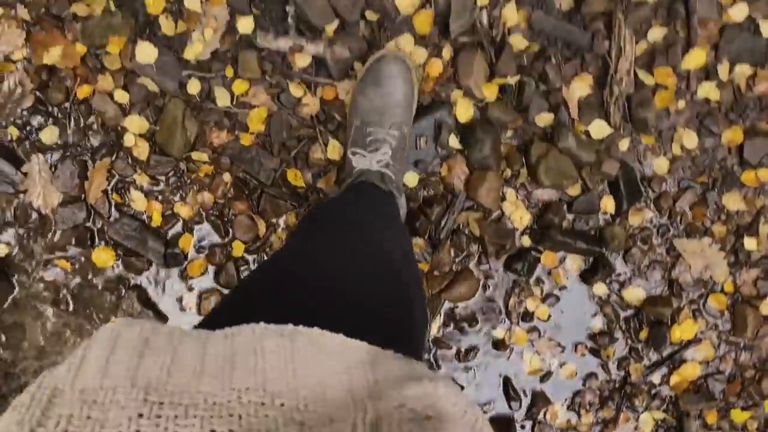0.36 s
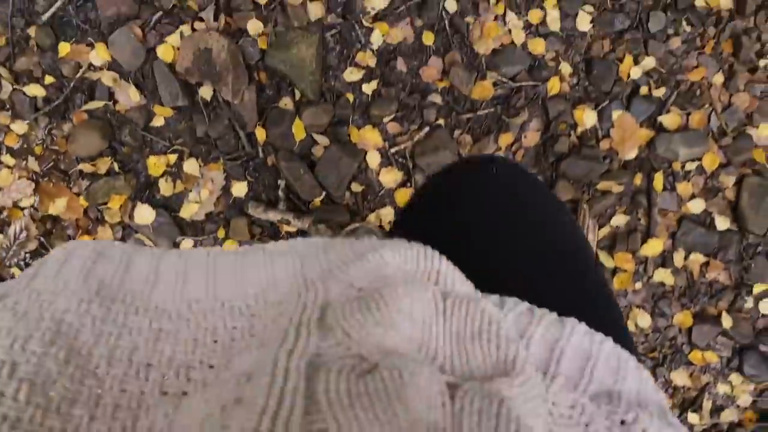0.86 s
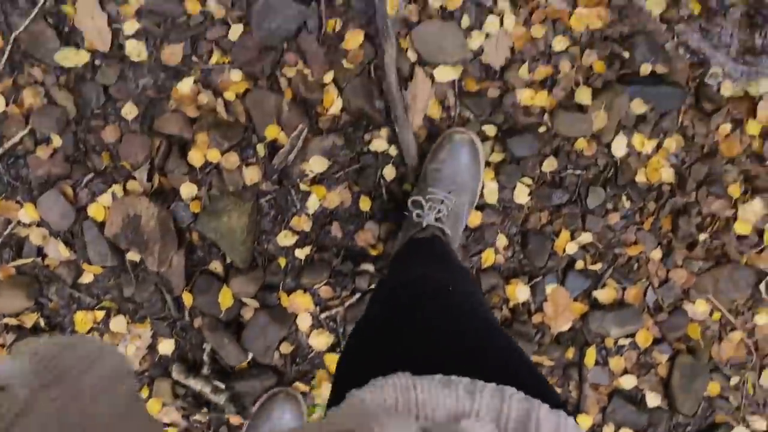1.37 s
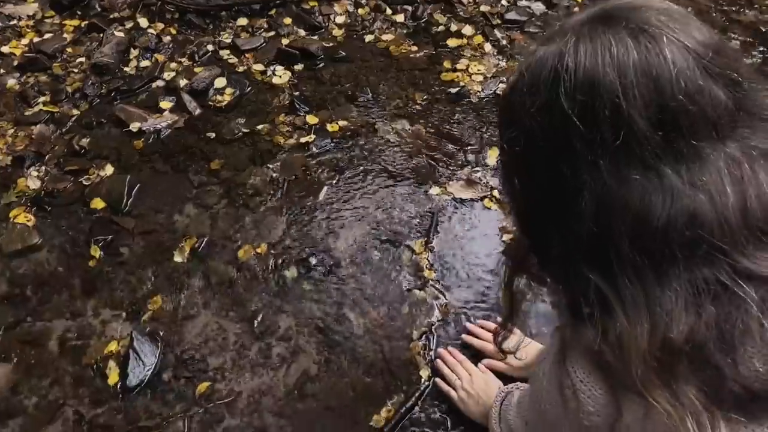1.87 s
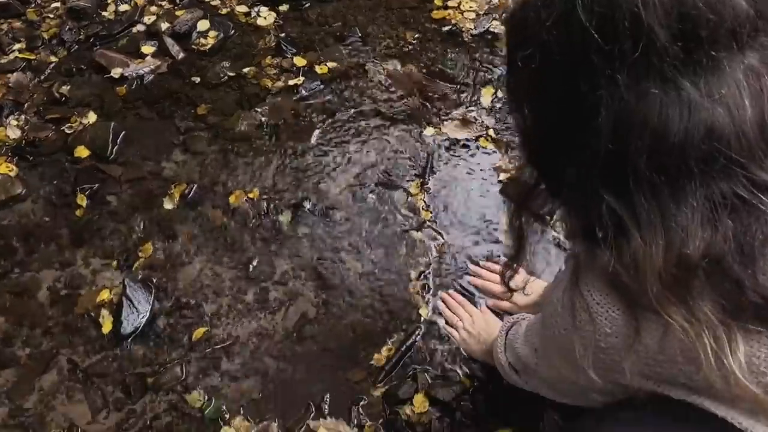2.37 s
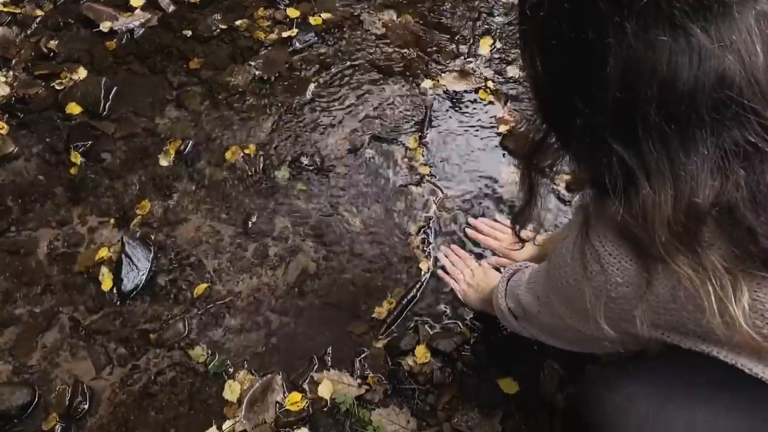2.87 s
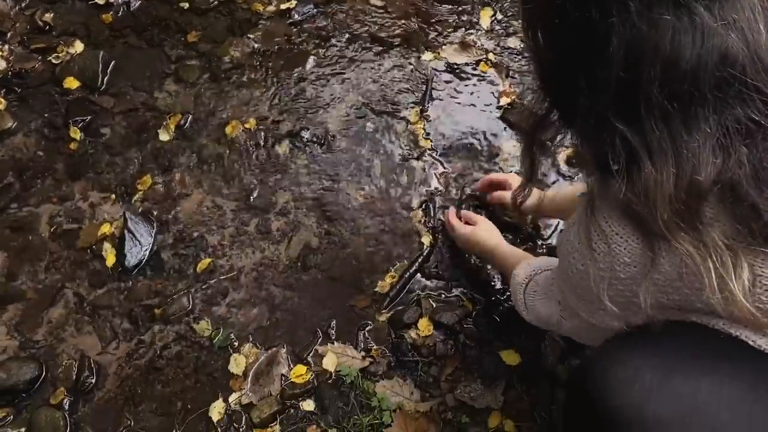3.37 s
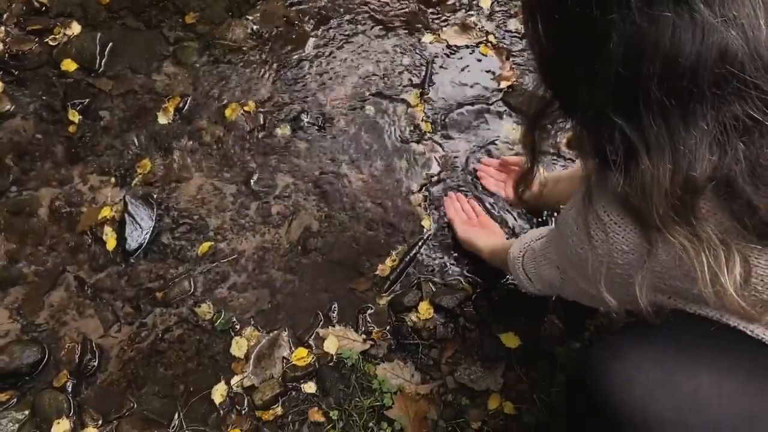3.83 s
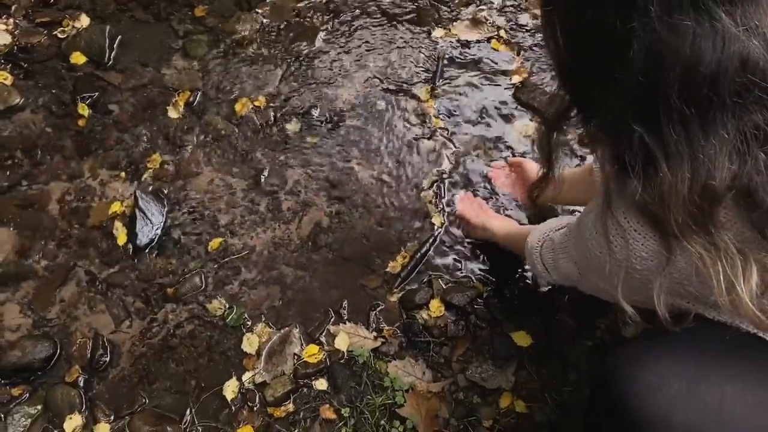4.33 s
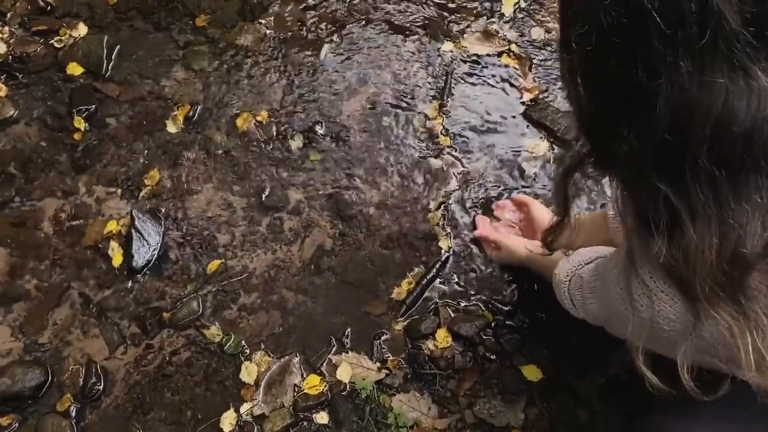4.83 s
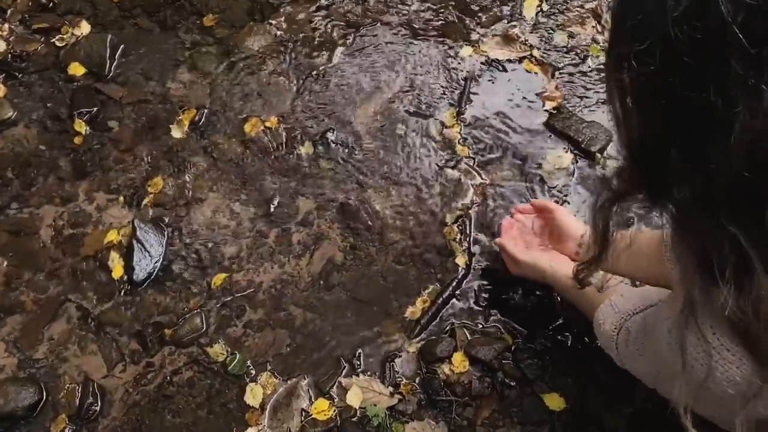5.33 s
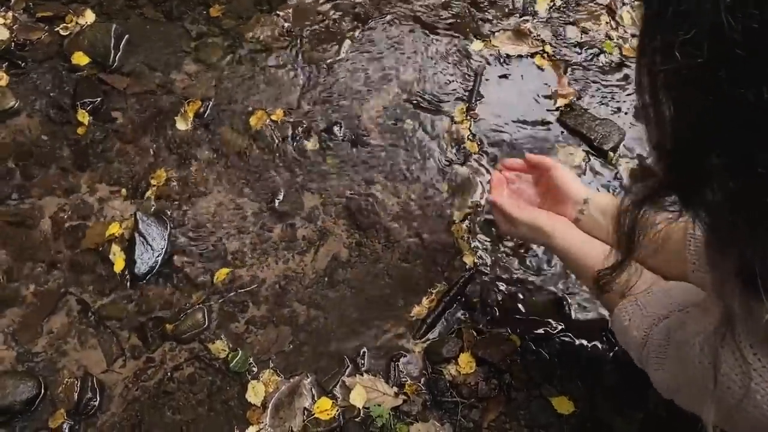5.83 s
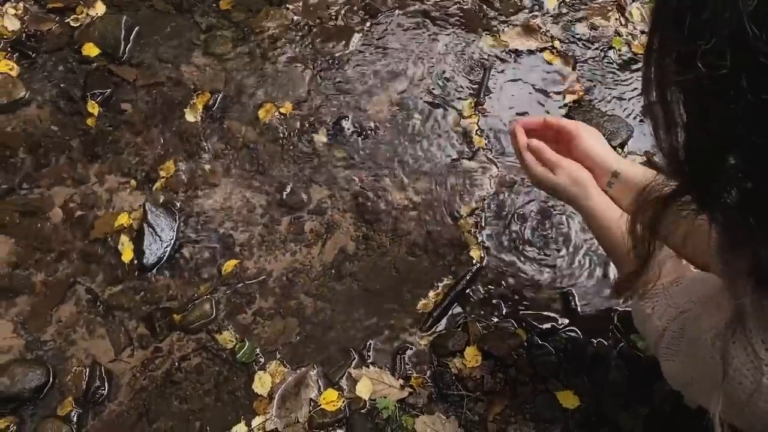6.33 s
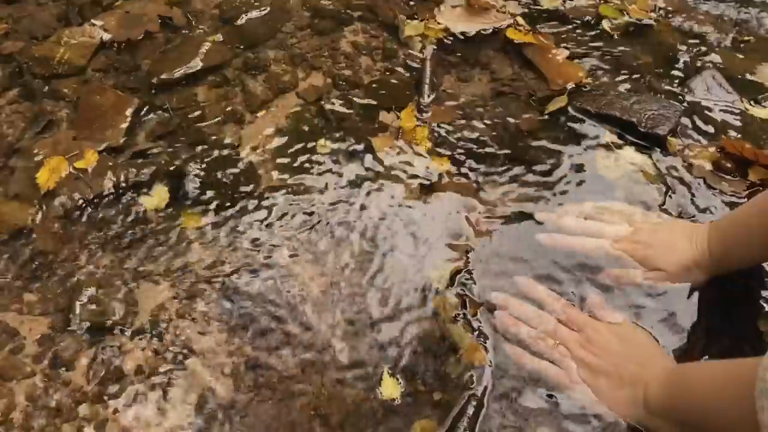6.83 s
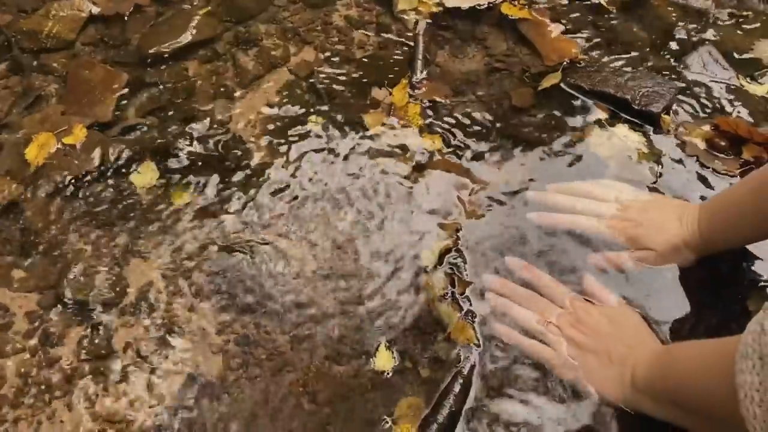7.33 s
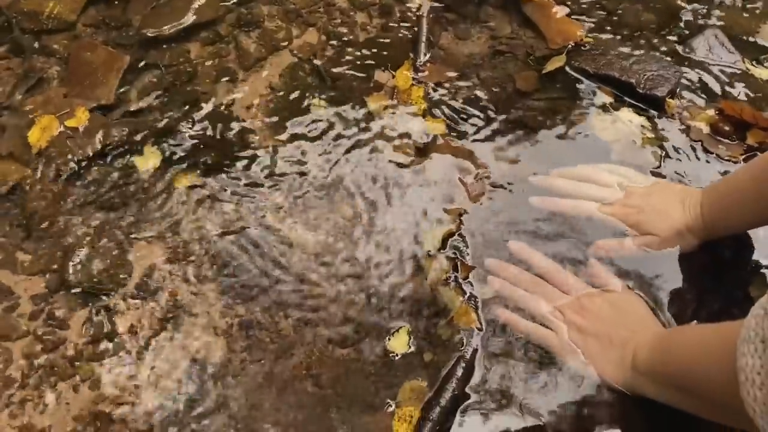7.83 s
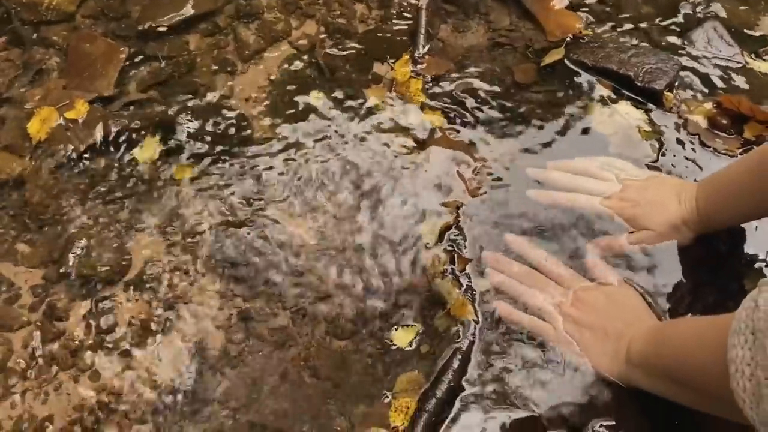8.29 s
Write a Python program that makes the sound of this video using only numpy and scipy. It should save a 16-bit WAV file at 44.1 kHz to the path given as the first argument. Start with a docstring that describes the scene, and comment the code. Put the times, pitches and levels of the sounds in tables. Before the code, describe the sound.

Close stereo microphone by a stony brook among trees. Brief gravelly footsteps and hard stone clacks open over steady running water. After a cut to a softer view of the stream, thin bird whistles sound in the distance and small drops tick. Low wind bumps the microphone, then water spills from hands in spray, bubbles and ringing drops. Finally the stream continues gently with four more bird notes.

```python
"""Boots crunch over wet gravel (filtered random clicks) and knock stones together (ringing modes) beside a
shallow woodland stream, which runs throughout: banded noise with fizz, gurgles and glugs. Then a small bird
gives thin trilled whistles, with one faint note far off. Hands scoop water and let it splash and drip back
(droplet clicks and ringing bubbles), and the bird returns. A light wind, low noise, buffets the microphone."""
import sys
import numpy as np
from scipy import signal
from scipy.fft import rfft, irfft, next_fast_len
from scipy.io import wavfile

SR = 44100
rng = np.random.default_rng(int(sys.argv[2]) if len(sys.argv) > 2 else 0)


def linear_from_db(decibels):
    """Turn decibels (scalar or array-like) into linear amplitude factors; 0 gives 1."""
    return 10 ** (np.asarray(decibels, float) / 20)


def inscribe(sig):
    """Save sig as 16-bit PCM at rate SR to the path in sys.argv[1].

    A 1-D sig is mono; a 2-D sig holds one channel per row.
    Samples are clipped to [-1, 1] before scaling.
    """
    pcm = np.round(np.clip(np.atleast_2d(sig).T, -1, 1) * 32767)
    wavfile.write(sys.argv[1], SR, pcm.astype(np.int16))


N = 371763
TIME_S = np.arange(N) / SR
OPPOSED = np.array([[1], [-1]])   # left and right with opposite sign


def rms_one(x):
    """Scale to unit rms."""
    return x / np.sqrt(np.mean(x ** 2) + 1e-20)


def band(x, low_hz, high_hz):
    """Butterworth band-pass, second order on each slope."""
    sos = signal.butter(2, [low_hz, min(high_hz, .45 * SR)], "band", fs=SR, output="sos")
    return signal.sosfilt(sos, x)


def drift(rate_hz):
    """Smooth random curve of unit rms: noise through two equal low-pass poles, one value per 40 samples."""
    pole = np.exp(-80 * np.pi * rate_hz / SR)
    noise = rng.standard_normal(N // 40 + 2002)
    slow = signal.lfilter([1], [1, -2 * pole, pole * pole], noise)[2000:]   # skip the filter's run-in
    return np.interp(np.arange(N) / 40, np.arange(len(slow)), rms_one(slow))


def placed(x, lean_db):
    """A near source, louder on the left by lean_db."""
    return x * linear_from_db(OPPOSED * lean_db / 2)


def ring(clicks, hz, t60_s):
    """Two-pole resonator: a unit click sets a decaying sine of height about 1 ringing."""
    radius, angle = linear_from_db(-60 / (t60_s * SR)), 2 * np.pi * hz / SR
    poles = [1, -2 * radius * np.cos(angle), radius * radius]
    return signal.lfilter([0, np.sin(angle)], poles, clicks + 1e-18)


def grains(per_s, spread_db, low_hz, high_hz, cycles, tilt_db):
    """Random clicks of uneven size and side ring at one of 12 pitches, falling 60 dB in some cycles; rms 1."""
    sizes = linear_from_db(spread_db * np.minimum(rng.exponential(1, N), 4.2)) * rng.choice([-1, 1], N)
    clicks = sizes * (rng.random(N) < per_s / SR)
    sided = clicks * linear_from_db(2.47 * rng.standard_normal(N) * OPPOSED)
    dealt = rng.integers(0, 12, N)
    total = 0
    for k, hz in enumerate(np.geomspace(low_hz, high_hz, num=12)):
        level_db = tilt_db * np.log2(hz / low_hz)   # tilt per octave
        total = total + linear_from_db(level_db) * ring(sided * (dealt == k), hz, cycles / hz)
    return rms_one(total)


def plinks(rows, rise, tick_db, attack_s, width=1.8):
    """Each drop spatters around its own pitch and its bubble rings, rising by a share as it nears the air."""
    spatter = 400   # samples
    out = np.zeros((2, N + SR))
    noises = rng.standard_normal((len(rows), spatter)) * np.exp(-np.arange(spatter) / SR / .002)
    for (start_s, level_db, hz, t60_s), noise in zip(rows, noises):
        t = np.arange(int(t60_s * SR) + spatter) / SR
        sound = np.sin(2 * np.pi * hz * (t + rise * t ** 2 / t60_s / 2))
        sound *= linear_from_db(-60 * t / t60_s) * (1 - np.exp(-t / attack_s))
        if tick_db is not None:
            sound[:spatter] += linear_from_db(tick_db) * band(noise, hz / width, hz * width)
        i = int(start_s * SR)
        lean_db = 6.5 * (1 + noise[0])   # the first noise value deals the side
        out[:, i:i + len(t)] += linear_from_db(level_db) * placed(sound, lean_db)
    return out[:, :N]


def plink_table(table, cycles):
    """Give each row a decay time: the same number of cycles to fall by 60 dB at any pitch."""
    return [(start_s, level_db, hz, cycles / hz) for start_s, level_db, hz in table]


def gurgles(low_hz, high_hz, spread_db, cycles, count):
    """Many bubbles at random moments and pitches, the small ones nearer and louder; rms 1."""
    when, pitch, size = rng.random((count, 3)).T
    hz = low_hz * (high_hz / low_hz) ** pitch
    size_db = -spread_db * np.log(np.maximum(size, .05)) + 2.2 * np.log2(hz / low_hz)
    rows = np.transpose([when * N / SR, size_db, hz, cycles / hz])
    return rms_one(plinks(rows, 0.18, None, 0.0006))


def bursts(rows, attack_s, build_db, fall_db_per_s):
    """Gains of two layers: bursts set in fast, build while they last, then die away; they add in power."""
    power = 0
    for start_s, length_s, *levels_db in rows:
        corners_s = [-attack_s, 0, length_s, length_s + 60 / fall_db_per_s]
        shape_db = np.interp(TIME_S - start_s, corners_s, [-40, -build_db, 0, -60], left=-150, right=-150)
        power = power + linear_from_db(2 * (shape_db + np.array(levels_db)[:, None]))
    return np.sqrt(power)


# ringing modes of a struck stone: pitch_hz, relative_level_db, t60_s
STONE_MODES = [(330, 8, .025), (520, 5, .018), (960, -1, .014), (1600, -3, .012), (2250, 2, .014),
               (4900, 8, .009), (6900, 4, .007)]
# stones knocked together: start_s, strike_db, dull_db (modes below 700 Hz), bright_db (above 3 kHz), all relative
STONE_KNOCKS = [(0.438, -24, 6.5, -18.5), (0.506, -0.5, -25, -19), (0.5194, -8, -17, -9),
                (0.566, -13, -5, -7.5), (1.038, -16.5, 1.5, -16), (1.102, -14, -5, -26.5),
                (1.1235, 5.5, -16, -15.5), (1.379, -18.5, 1.5, -24), (1.419, -13.5, -31, -2.5),
                (1.481, -17.5, -34.5, 1)]


def stone_knocks():
    """Each contact excites decaying sines; a blunt contact swells in, and the upper modes start 1 ms later."""
    start_s, strike_db, dull_db, bright_db = np.transpose(STONE_KNOCKS)
    knocks, t = np.zeros(N), np.arange(SR // 20) / SR
    chance = rng.standard_normal((len(start_s), 2, len(STONE_MODES)))
    for k, (hz, mode_db, t60_s) in enumerate(STONE_MODES):
        colour_db = dull_db if hz < 700 else bright_db if hz > 3000 else 0
        level_db = strike_db + colour_db + mode_db - 5.5 + 2 * chance[:, 0, k]
        sizes = linear_from_db(level_db) * (-1) ** k
        swell = linear_from_db(-60 * t / t60_s) - linear_from_db(-60 * t / (0.209 * t60_s))
        lag_s = .001 * (hz > 3000)   # upper modes sound as the contact hardens
        first = ((start_s + lag_s) * SR).astype(int)
        for i, size, detune in zip(first, sizes, chance[:, 1, k]):
            pitch_hz = hz * (1 + .04 * detune)   # stones differ in pitch
            knocks[i:i + len(t)] += size * swell * np.sin(2 * np.pi * pitch_hz * t)
    return placed(knocks, 2.7)


# boots pressing gravel: start_s, length_s, grit_level_db, low_crush_level_db
BOOT_PRESSES = [(.17, 0.12, -31.5, -30.5), (.43, 0.0534, -27.5, -39), (.495, 0.025, -19.5, -30.5),
                (1.14, 0.059, -26, -37), (1.4, 0.08, -30, -46)]
# the clearest pebbles ticking under the boots: start_s, level_db, pitch_hz
PEBBLE_TICKS = [(.7165, -21, 1450), (0.792, -19.5, 2700), (0.9089, -20, 2980)]


def boots():
    """Gravel grinds under the sole as ringing grains; pebbles tick and stones knock between the steps."""
    walking = TIME_S < STANDPOINTS[1][0]   # until the second standpoint
    pressed, crushed = walking * bursts(BOOT_PRESSES, attack_s=0.02, build_db=3, fall_db_per_s=353.5)
    pebbles = grains(220, 4.6, 1100, 4000, 26.0, -1.0)
    grit = grains(2200 * linear_from_db(4 * drift(25.0)), 4.0, 1500, 7500, 9.0, -2.0)
    crush = grains(700, 3.0, 220, 900, 13.0, .8)
    settling = walking * linear_from_db(-50.5)   # gravel keeps settling between the steps
    gravel = pressed * grit + (crushed + settling) * crush + walking * linear_from_db(-42) * pebbles
    ticks = plinks(plink_table(PEBBLE_TICKS, 26.0), 0, 0, 0.00011)
    return gravel + stone_knocks() + ticks


# a sheet of water falls back: peak_s, half_length_s, level_db
SLOSH_SHEET = (5.48, 0.025, -31)


def slosh():
    """A falling sheet of water: low-mid noise under one smooth hump."""
    peak_s, half_length_s, level_db = SLOSH_SHEET
    hump = np.exp(-((TIME_S - peak_s) / half_length_s) ** 2)
    return linear_from_db(level_db) * hump * rms_one(band(rng.standard_normal(N), 90, 450))


# gushes of water off the hands: start_s, length_s, droplets_level_db, fine_spray_level_db
WATER_GUSHES = [(5.045, 0.37, -39, -36), (5.348, 0.013, -46, -21), (5.42, 0.083, -28, -23),
                (5.53, 0.77, -39, -35.5), (6.275, 0.052, -29.5, -24), (6.365, 0.027, -22.5, -25.5),
                (6.422, 0.0085, -19.5, -25.5)]
# drops that ring clearly: start_s, level_db, start_pitch_hz
CLEAR_DROPS = [(5.6867, -15, 3710), (5.707, -23, 3500), (5.8182, -21.5, 3470), (5.821, -18, 4260),
               (5.9073, -12, 6440), (6.063, -15.5, 3900), (6.1306, -21, 3150), (6.1485, -20, 3150),
               (6.2208, -19, 4800), (6.237, -19.5, 3580), (6.338, -14.5, 3460), (6.3461, -7, 5540),
               (6.4184, -7, 6560), (6.631, -18.5, 3450), (8.387, -24, 2360)]
# larger bubbles: start_s, level_db, start_pitch_hz
LARGE_BUBBLES = [(0.308, -25.5, 1134), (3.74, -33, 1012), (5.643, -18.5, 1246), (5.739, -27, 1510),
                 (5.858, -30.5, 810), (6.061, -20.5, 970), (6.088, -26, 673), (6.192, -28.5, 787),
                 (6.377, -24.5, 585), (6.422, -24.5, 537), (6.425, -20.5, 1347), (6.458, -27.5, 470),
                 (6.484, -24, 1610), (7.68, -23.5, 1500)]
# drops that burst flat on stone or water, hardly ringing: start_s, level_db, start_pitch_hz
FLAT_SPLATS = [(2.5995, -26.5, 5300), (3.252, -21, 4900), (4.1452, -22.5, 7000), (5.3604, -17, 2720),
               (5.595, -20, 2500), (5.885, -18, 3200), (5.9027, -17, 3060), (5.979, -21.5, 2700),
               (6.045, -14, 4970), (6.1, -17.5, 4630)]


def hands():
    """Droplets, froth and spray of poured water, with clear drops and bubbles around hands, boots and stones."""
    dripping, spraying = bursts(WATER_GUSHES, attack_s=0.015, build_db=6.5, fall_db_per_s=695)
    droplets = grains(600 * linear_from_db(4.5 * drift(35.0)), 5.3, 1970, 5550, 29.0, 1.0)
    spray = grains(6000 * linear_from_db(5.9 * drift(36.0)), 4.4, 2500, 10900, 9.1, 7.1)
    froth = linear_from_db(-5.0) * gurgles(608.0, 2600, 6.0, 47.0, count=2200)
    poured = dripping * (droplets + froth) + spraying * spray + slosh()
    splats = plinks(plink_table(FLAT_SPLATS, 26.0), 0.12, 3.5, 0.00023, 1.75)
    drops = plinks(plink_table(CLEAR_DROPS, 82), 0.12, -0.69, 0.0003)
    bubbles = plinks(plink_table(LARGE_BUBBLES, 72), 0.26, -8, 0.00072)
    return poured + splats + drops + bubbles


# bird notes, each a rising slur: start_s, length_s, start_pitch_hz, level_db (direct sound)
BIRD_NOTES = [(2.094, 0.18, 7430, -39.5), (2.321, 0.1554, 7450, -39), (2.567, 0.13, 7550, -35.5),
              (6.866, 0.14, 7260, -37), (7.071, 0.12, 7335, -33.5), (7.274, 0.16, 7340, -32),
              (7.505, 0.16, 7110, -33)]
# a second bird far off holds one faint note: start_s, length_s, pitch_hz, level_db (direct sound)
FAR_BIRD_NOTE = (2.84, 0.16, 4290, -49)


def among_trees(song):
    """Echoes off the trunks: the song smeared by decaying noise, a different one on each side."""
    t60_s = 0.44
    tail_s = np.arange(int(t60_s * SR)) / SR
    echoes = rng.standard_normal((2, len(tail_s))) * linear_from_db(-60 * tail_s / t60_s)
    echoes /= np.sqrt(np.sum(echoes ** 2, axis=1, keepdims=True))
    wet = signal.fftconvolve(song[None], echoes, axes=1)[:, :N]
    return placed(song, 3.0) + linear_from_db(6.5) * wet


def bird(trill_per_s, swing_hz, rough_hz):
    """A thin whistle: a sine with a fast uneven trill in pitch, smeared by echoes off the trunks."""
    song = np.zeros(N)
    uneven_per_s = trill_per_s * (1 + 0.37 * drift(29.6))
    trill_hz = swing_hz * np.sin(2 * np.pi * np.cumsum(uneven_per_s) / SR) + rough_hz * drift(86.0)
    for start_s, length_s, start_hz, level_db in BIRD_NOTES:
        along = np.clip((TIME_S - start_s) / length_s, 0, 1)
        slur_hz = 470 * (1 - (1 - along) ** 2.0)   # rises, then levels off
        pitch_hz = start_hz + slur_hz + trill_hz
        swell = np.sin(np.pi * along) ** 0.14
        song += linear_from_db(level_db) * swell * np.sin(2 * np.pi * np.cumsum(pitch_hz) / SR)
    start_s, length_s, hz, level_db = FAR_BIRD_NOTE
    swell = np.sin(np.pi * np.clip((TIME_S - start_s) / length_s, 0, 1)) ** .5
    song += linear_from_db(level_db) * swell * np.sin(2 * np.pi * hz * TIME_S)
    return among_trees(song)


# the stream as heard from three standpoints:
# start_s, level_db, swell_db_per_s, extra_low_rush_db, extra_fizz_db
STANDPOINTS = [(0, -36.5, 3, 1.5, -1.5), (1.491, -40, 0.53, 1, 0), (6.7, -42, 0.1, 6, -2.5)]
# brief dips of the low rush near each change of standpoint: deepest_s, sinks_for_s, returns_in_s, depth_db
LOW_DIPS = [(1.66, 0.21, 0.17, -13), (6.8, 0.33, 0.0645, -10.5)]


def flow():
    """Stream level and its low, middle and fizz offsets in dB: steps by standpoint, plus the dips."""
    starts_s = [row[0] for row in STANDPOINTS]
    which = np.searchsorted(starts_s, TIME_S, "right") - 1
    start_s, level_db, swell, low_db, fizz_db = np.transpose(STANDPOINTS)[:, which]
    dips_db = 0
    for deepest_s, sinks_s, returns_s, depth_db in LOW_DIPS:
        corners_s = [deepest_s - sinks_s, deepest_s, deepest_s + returns_s]
        dips_db = dips_db + np.interp(TIME_S, corners_s, [0, depth_db, 0])
    middle_db = 0.29 * dips_db   # the middle feels a share of each dip
    return level_db + swell * (TIME_S - start_s), low_db + dips_db, middle_db, fizz_db


# colour of the rush: pitch_hz, relative_density_db (per Hz)
RUSH_COLOUR = [(35, -28), (100, -4.5), (200, -7.5), (350, -2), (480, -6), (740, -17), (1540, -7.5),
               (3500, -8), (7000, -12), (16000, -24)]
# how alike the rush is on both sides at the source: pitch_hz, likeness (1 is the same sound)
RUSH_LIKENESS = [(60, 0.97), (300, 0.85), (800, 0.069), (5000, 0.18), (9000, 1)]
# sideways lean of the rush: pitch_hz, left_over_right_db
RUSH_LEAN = [(100, -0.5), (1500, 4), (9000, 1)]


def at_hz(points, hz):
    """Read a table on a log-frequency axis."""
    table_hz, values = np.transpose(points)
    return np.interp(np.log(hz), np.log(table_hz), values)


def rush(low_db, middle_db, patchy_db, shared_db):
    """Far water: half-octave bands of noise, each with its own flicker, likeness and lean; rms 1."""
    out, together = 0, drift(6.0)
    edges_hz = 30 * 2 ** np.arange(0, 9.6, .5)
    white = rng.standard_normal((2, 2, N))
    for k, (low_hz, high_hz) in enumerate(zip(edges_hz, edges_hz[1:])):
        mid, side = band(white[k % 2], low_hz, high_hz)   # neighbouring bands use different noise
        hz = np.sqrt(low_hz * high_hz)
        alike = np.clip(at_hz(RUSH_LIKENESS, hz), -1, 1)
        offset_db = low_db if hz < 480 else middle_db * (hz < 2500)
        flicker_db = shared_db * together + patchy_db * drift(36.0)
        gain = linear_from_db(at_hz(RUSH_COLOUR, hz) + offset_db + flicker_db)
        pair = np.sqrt(1 + alike) * mid + np.sqrt(1 - alike) * side * OPPOSED
        out = out + placed(gain * pair, at_hz(RUSH_LEAN, hz))
    return rms_one(out)


def stream():
    """Far rush, with near fizz, gurgles and low glugs between the stones popping out of it."""
    level_db, low_db, middle_db, fizz_db = flow()
    far = rush(low_db, middle_db, patchy_db=2.3, shared_db=1.0)
    fizz = grains(450 * linear_from_db(4.5 * drift(6.9)), 4.5, 4500, 11930, 15.0, -1.5)
    near = linear_from_db(-7.5 + fizz_db) * placed(fizz, 8.1)
    near = near + linear_from_db(-11 + low_db) * gurgles(259.0, 420.0, 5.5, 58.0, count=260)   # glugs
    near = near + linear_from_db(-11 + 0.67 * low_db) * gurgles(749.5, 3610, 4.3, 72.0, count=2000)
    return linear_from_db(level_db) * (far + near)


# wind rumble: time_s, level_db
WIND_LEVEL = [(0, -41), (.9, -79), (1.3, -54), (1.52, -88), (2.8, -51), (4.95, -42), (5.3, -36.5),
              (6.0, -44.5), (6.5, -74), (8.43, -49)]
# single buffets: centre_s, peak_db
WIND_PUFFS = [(0.266, -30), (3.581, -31), (3.757, -31), (3.997, -24.5), (5.13, -25.5), (5.18, -26)]


def wind():
    """Lumpy low pressure on both microphone ports, mostly shared; a buffet is one or two slow swings."""
    shared, own = rng.standard_normal(N), rng.standard_normal((2, N))
    lumps = linear_from_db(4.5 * drift(14.7))
    low = band(band(lumps * (shared + 0.305 * own), 26, 128), 33.0, 190)
    level_db = np.interp(TIME_S, *np.transpose(WIND_LEVEL), left=-150, right=-150)
    buffets = 0
    for centre_s, peak_db in WIND_PUFFS:
        t = TIME_S - centre_s
        buffets = buffets + linear_from_db(peak_db) * np.exp(-(t / 0.014) ** 2) * np.cos(2 * np.pi * 68 * t)
    return linear_from_db(level_db) * rms_one(low) + buffets


def scene():
    """All sources at the two microphone ports."""
    song = bird(trill_per_s=150, swing_hz=94, rough_hz=68.0)
    return boots() + hands() + song + stream() + wind()


def top_cut(x):
    """Nothing passes above the cut-off."""
    return signal.sosfilt(signal.butter(12, 16630, fs=SR, output="sos"), x)


# left leads a little in the middle range: pitch_hz, lead_half_turns
LEFT_LEAD = [(0, 0), (1800, .35), (3600, 0)]
# the phase between left and right steps half a turn at each pitch: pitch_hz
TREBLE_PHASE_STEPS = [8275, 9675, 12475, 14125]


def record(dry):
    """The stereo treble narrows, then its phase is set by stepped bands; band ends are cut, the loudest knock clips."""
    size = next_fast_len(N + SR)
    hz = np.fft.rfftfreq(size, 1 / SR)
    steps = [np.clip((hz - step_hz) / 250 + .5, 0, 1) for step_hz in TREBLE_PHASE_STEPS]   # ramps 250 Hz wide
    phase = (np.interp(hz, *np.transpose(LEFT_LEAD)) - sum(steps)) * np.pi / 2
    left, right = rfft(dry, size)
    side_gain = linear_from_db(-5.5 * steps[0])   # treble above about 8.3 kHz is closer to mono
    narrowed = (left + right) / 2 + (left - right) / 2 * side_gain * OPPOSED
    heard = irfft(narrowed * np.exp(1j * phase * OPPOSED), size)[:, :N]
    clipped = np.clip(band(heard, 35, 14700), -1, 1)
    return top_cut(clipped)


dry = scene()
out = record(dry)
inscribe(out)
```